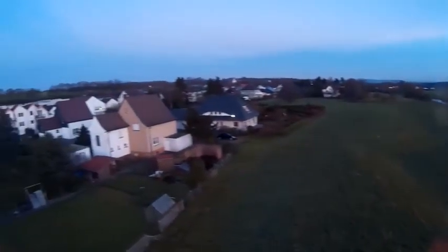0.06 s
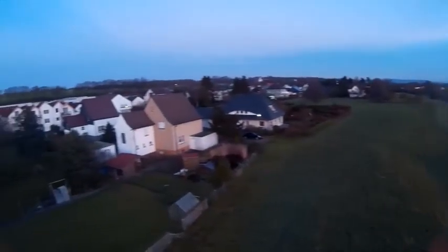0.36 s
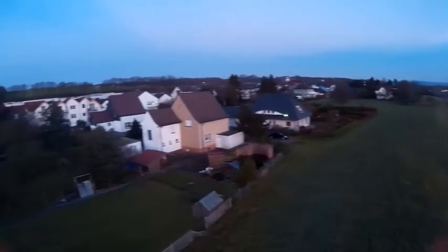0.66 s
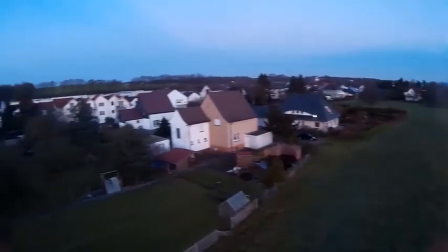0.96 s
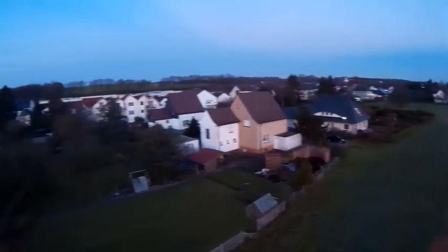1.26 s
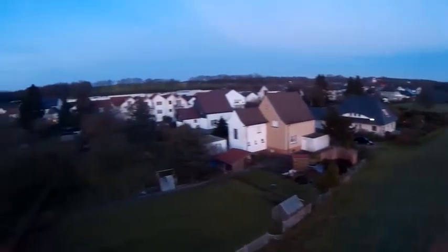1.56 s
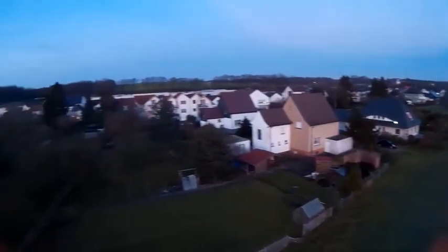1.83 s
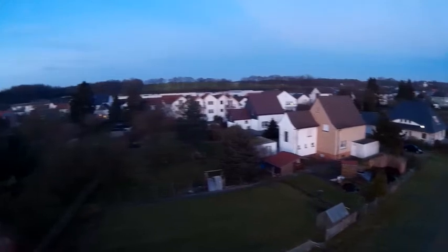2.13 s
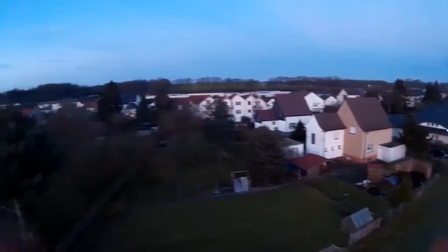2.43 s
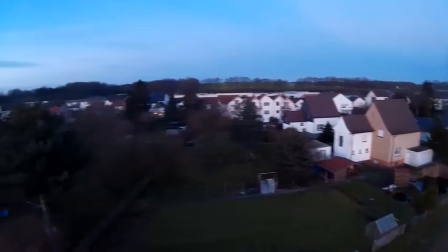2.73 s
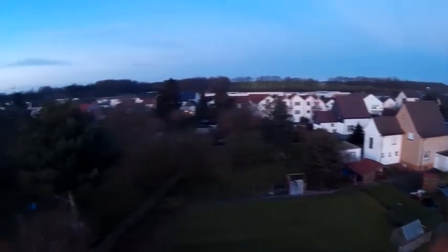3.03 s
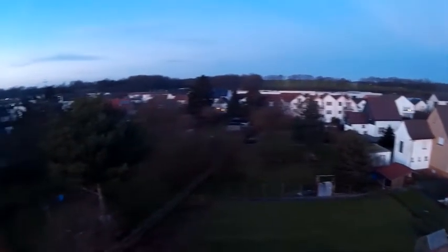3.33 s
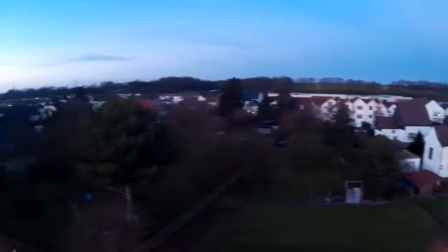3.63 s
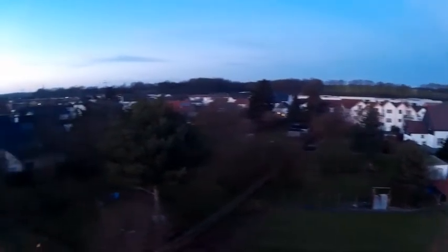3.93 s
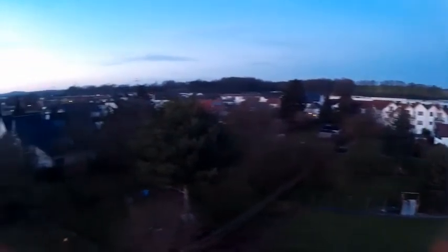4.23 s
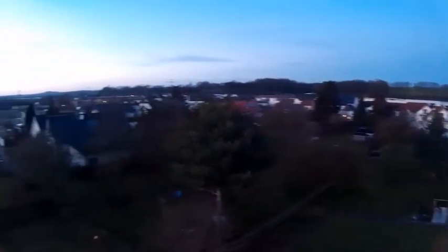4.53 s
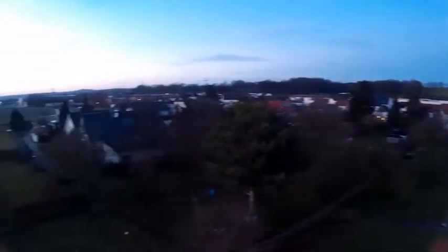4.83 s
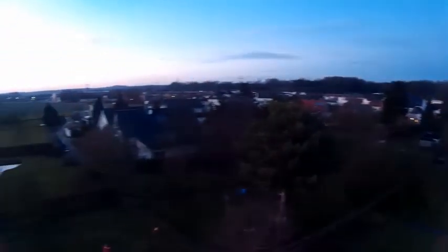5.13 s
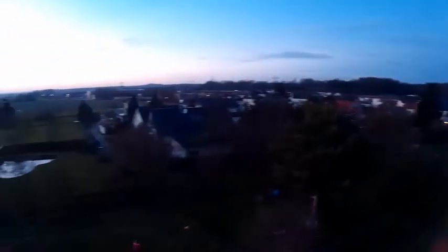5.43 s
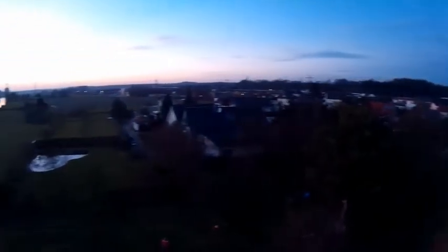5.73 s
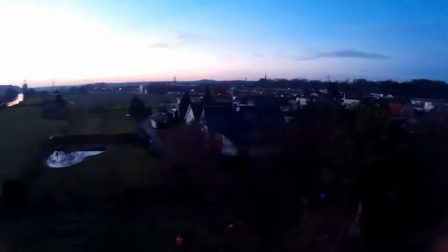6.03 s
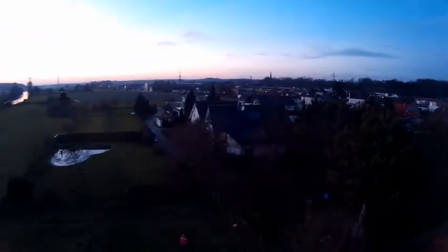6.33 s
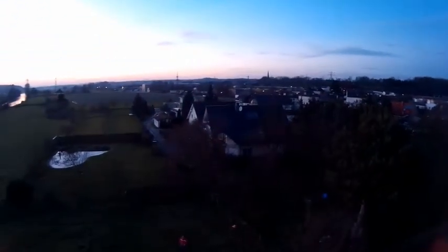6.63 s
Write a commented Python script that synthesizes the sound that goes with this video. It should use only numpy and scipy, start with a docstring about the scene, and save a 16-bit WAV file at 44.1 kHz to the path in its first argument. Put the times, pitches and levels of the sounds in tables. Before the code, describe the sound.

Close drone propellers drone on with a low, wavering hum and rushing air while a loose part buzzes and ticks.

```python
"""A four-rotor drone in flight, heard from the camera that it carries.
Four motors at slightly different speeds shake the frame and beat against one another;
the body and arms ring with their tones. The blades whir and churn the air.
The shaking makes a loose part of the camera mount buzz in quick, uneven ticks."""
import sys
import numpy as np
from scipy import signal
from scipy.fft import rfft, irfft, next_fast_len
from scipy.io import wavfile
from scipy.ndimage import map_coordinates

SR = 44100
rng = np.random.default_rng(int(sys.argv[2]) if len(sys.argv) > 2 else 0)


def bounce(signal):
    """Save signal as a 16-bit WAV file at the path given by the first command-line argument."""
    frames = np.transpose(np.atleast_2d(signal))
    limited = np.clip(frames, -1, 1)
    pcm = np.round(limited * 32767).astype(np.int16)
    wavfile.write(sys.argv[1], SR, pcm)


N = 298557


def amp(db):
    """Decibels to gain."""
    return 10 ** (np.asarray(db) / 20)


def unit(x):
    """x at rms 1."""
    return x / np.sqrt(np.mean(x ** 2) + 1e-20)


def curve(rows):
    """(seconds, value) rows interpolated to one value per sample."""
    times_s, values = np.transpose(rows)
    return np.interp(np.arange(N) / SR, times_s, values)


def wobble(knots_per_s):
    """Smooth random curve through Gaussian knots."""
    knots = rng.standard_normal(int(N * knots_per_s / SR) + 4)
    return map_coordinates(knots, [np.arange(N) * knots_per_s / SR])


def filtered(x, response):
    """x through a complex frequency response."""
    size = next_fast_len(N + 8192)
    return irfft(rfft(x, size) * response(np.fft.rfftfreq(size, 1 / SR)), size)[:N]


def coloured(x, points):
    """x through a (Hz, dB) curve, at rms 1."""
    points_hz, db = np.transpose(points)
    return unit(filtered(x, lambda hz: amp(np.interp(np.log(hz + 1), np.log(points_hz), db))))


def resonant(x, modes):
    """x through steep minimum-phase (Hz, width Hz, dB) resonances, at rms 1."""
    def response(hz):
        power = sum(amp(db) ** 2 / (1 + ((hz - centre_hz) / (width_hz / 2)) ** 4)
                    for centre_hz, width_hz, db in modes)
        cepstrum = irfft(np.log(power + 1e-9) / 2)
        causal = np.arange(len(cepstrum)) < len(cepstrum) / 2
        return np.exp(rfft(2 * cepstrum * causal))
    return unit(filtered(x, response))


# Shaft speed, one table per rotor. Each row: time in seconds, speed in turns per second.
SHAFT_1_HZ = [(0, 74.1), (.4, 74.6), (.7, 75.5), (1.2, 74.2), (1.6, 74.4), (2.3, 73.9), (3, 74.2),
              (3.2, 75.3), (3.6, 74.6), (4.15, 75.4), (4.4, 73.2), (5, 73.1), (5.35, 73.8), (5.6, 73),
              (5.8, 77.5), (6.3, 75.9), (6.55, 71.8), (6.77, 71.2)]
SHAFT_2_HZ = [(0, 70.2), (.4, 69.3), (.9, 70.6), (1.3, 69.3), (1.8, 71.2), (2, 70.2), (2.7, 71.6),
              (3.1, 73.2), (3.9, 71.1), (4.4, 71.8), (5.25, 71.2), (5.6, 72.2), (5.8, 74.3), (6, 72.8),
              (6.3, 72.4), (6.5, 68.6), (6.77, 68.7)]
SHAFT_3_HZ = [(0, 68.6), (.4, 69.7), (1, 68.6), (1.7, 67.8), (2.8, 67.7), (3.4, 66.9), (3.6, 67.9),
              (4.15, 68.5), (4.5, 65.6), (5.35, 64.9), (5.62, 66.2), (5.8, 62), (6.3, 63.5), (6.45, 62.2),
              (6.77, 63.5)]
SHAFT_4_HZ = [(0, 65.7), (.7, 64.7), (1.05, 65.8), (1.8, 65.6), (2.5, 66.3), (3.7, 66.3), (4, 65.4),
              (4.4, 68.1), (4.6, 67.4), (5, 67.2), (5.35, 68.6), (5.8, 66.2), (6.05, 68.1), (6.3, 68.5),
              (6.5, 67.1), (6.77, 68)]
def shaft_angle(speed_rows, trim_hz):
    """Rotor angle in radians; the flight controller keeps trimming the speed."""
    speed_hz = curve(speed_rows) + trim_hz * wobble(24)
    return 2 * np.pi * np.cumsum(speed_hz) / SR


# Hum per rotor. Each row: levels of orders 1, 2, 3, 4, 8 in dB, odd-order change in the swerve in dB.
HUM_ORDERS_DB = [(-38.5, -20, -42, -15, -43, 0), (-30, -27.5, -32, -21.5, -51, 10),
                 (-33, -25.5, -36, -18, -54, -6), (-19.5, -27.5, -29, -19.5, -53, -5)]
# Swerve that shifts the strain between the arms: start in seconds, length in seconds.
SWERVE_S = (5.4, .45)
# Blade hum, one table per rotor. Each row: time in seconds, even-order gain in dB.
BLADE_1_DB = [(0, -8), (.6, -12), (2, -10), (3.6, -2), (4.5, 0.5), (5.4, 1), (5.9, -4), (6.77, -6)]
BLADE_2_DB = [(0, 2), (.6, 0), (1.4, -3.5), (2.3, 0), (4.8, -4), (5.7, 5), (6.3, 0.5), (6.77, 5.5)]
BLADE_3_DB = [(0, -3), (1, -3.5), (2.6, .5), (4.1, 0.5), (4.6, -8.5), (5.4, -13), (5.85, -3), (6.77, -1.5)]
BLADE_4_DB = [(0, -1), (2.7, -0.5), (4.05, -2), (4.7, 4), (5.8, 4), (6.77, 1)]
def rotor_hum(angle, levels_db, blade_rows, flutter_db):
    """Low shaft orders of one rotor: odd from its unbalance, even from its two blades."""
    *orders_db, swerve_db = levels_db
    start_s, length_s = SWERVE_S
    unbalance_db = swerve_db * np.clip((np.arange(N) / SR - start_s) / length_s, 0, 1)
    blade_db = curve(blade_rows)
    hum = np.zeros(N)
    for order, db in zip((1, 2, 3, 4, 8), orders_db):
        gain = amp(db + (unbalance_db if order % 2 else blade_db))
        hum += gain * np.sin(order * angle + rng.uniform(0, 2 * np.pi))
    return np.sqrt(2) * hum * amp(flutter_db * wobble(40))


# Body resonances. Each row: centre in Hz, width in Hz, relative gain in dB.
BODY_MODES = [(341, 23.5, 2), (449, 53, -5), (573, 62, -2.5), (688, 65, -1.5), (850, 62, 6)]
def frame_flex(frame, cubic, level_db):
    """Uneven flexing mixes the rotor tones into sum tones that ring in the body."""
    return amp(level_db) * resonant(frame ** 2 + cubic * frame ** 3, BODY_MODES)


def blade_tones(angle, odd_db):
    """Upper shaft orders of a two-bladed propeller; unequal blades give the odd ones."""
    return sum(amp(odd_db * (order % 2)) * np.sin(order * angle + rng.uniform(0, 2 * np.pi))
               for order in range(5, 28))


# Arm resonances. Each row: centre in Hz, width in Hz, relative gain in dB.
ARM_MODES = [(1571, 92, 2.5), (1675, 47, 0), (1679, 62, 2.5)]
# Whine path to the camera. Each entry: one rotor's relative gain in dB.
WHINE_PATH_DB = [2.5, -5.5, 0, -3]
def arm_whine(angles, level_db, waver_db):
    """High shaft orders ring in the arms as a thin whine."""
    tones = sum(blade_tones(angle, odd_db=2.0) * amp(path_db + waver_db * wobble(14))
                for angle, path_db in zip(angles, WHINE_PATH_DB))
    return amp(level_db) * resonant(tones, ARM_MODES)


# Blade load. Each row: time in seconds, whir gain in dB.
LOAD_DB = [(0, -45.5), (.8, -45.5), (1.9, -46.5), (2.5, -43.5), (3.1, -45), (3.7, -41.5), (4.5, -42),
           (5.2, -40), (5.5, -41.5), (5.62, -37), (5.78, -42), (6.1, -41.5), (6.77, -43)]
# Camera housing response. Each row: frequency in Hz, relative gain in dB.
HOUSING_EQ = [(250, -9), (340, -1), (490, -5), (620, 1.5), (690, -1), (760, -6.5), (860, -4), (930, -17),
              (1200, -11.5), (1480, -10.5), (1710, -10.5), (1800, -23), (2600, -55)]
def blade_whir(angles, chop_depth, tones_gain_db, air_gain_db):
    """Blade tones and turbulence that pulses with each blade pass, heard through the housing."""
    tones = unit(sum(blade_tones(angle, odd_db=-5.0) for angle in angles))
    blade_pass = sum(np.cos(2 * angle) for angle in angles)
    turbulence = rng.standard_normal(N) * np.exp(chop_depth * blade_pass)
    whir = amp(tones_gain_db) * coloured(tones, HOUSING_EQ)
    whir += amp(air_gain_db) * coloured(turbulence, HOUSING_EQ)
    return amp(curve(LOAD_DB)) * whir


# Churned air. Each row: frequency in Hz, relative spectral density in dB.
WASH_SPECTRUM = [(20, -24), (38, -23), (53, -2.5), (80, 3), (200, 5), (600, -7), (1000, -39), (2200, -19),
                 (4500, -31), (6000, -43.5), (9500, -51.5), (11200, -43), (12500, -40), (16000, -62)]
def rotor_wash(level_db, waver_db):
    """Air churned by the blades: a low, wavering rush."""
    gain = amp(level_db + waver_db * wobble(6.06))
    return gain * coloured(rng.standard_normal(N), WASH_SPECTRUM)


# Moments when the loose part stays seated. Each row: centre in seconds, length in seconds, gain in dB.
SEATED_DIPS = [(0.054, 0.046, -10.5), (0.118, 0.056, -15), (0.286, 0.02, -16), (0.454, 0.041, -12),
               (0.549, .029, -17.5), (0.634, 0.039, -17), (.838, 0.034, -18.5), (0.926, .018, -19),
               (0.963, 0.032, -20), (1.044, 0.041, -17.5), (1.446, 0.054, -13), (1.906, 0.037, -21),
               (2.08, 0.02, -14), (2.276, 0.045, -13), (2.663, 0.022, -12), (2.759, .042, -8),
               (3.158, 0.036, -14), (3.266, 0.088, -17), (3.849, 0.017, -24), (4.033, 0.022, -14),
               (4.217, 0.014, -20), (4.856, 0.017, -13), (5.088, .025, -15), (5.136, .034, -12),
               (5.648, 0.019, -15), (5.735, 0.022, -15), (6.054, 0.034, -16), (6.184, 0.011, -21),
               (6.258, 0.022, -12)]
# Mount looseness. Each row: time in seconds, buzz level in dB.
BUZZ_DB = [(0, -38), (.35, -41), (1.2, -39), (2.1, -38.5), (2.9, -40.5), (3.5, -39), (4.4, -40), (5.2, -39),
           (6, -39.5), (6.77, -39.5)]
def looseness_db(swell_db=1.13, catches=10, catch_s=0.019, catch_db=-7):
    """Buzz level: swells at random, dips when the loose part seats or briefly catches."""
    t = np.arange(N) / SR
    random_dips = [(centre_s, catch_s, catch_db) for centre_s in rng.uniform(0, N / SR, size=catches)]
    dips_db = np.zeros(N)
    for centre_s, length_s, db in SEATED_DIPS + random_dips:
        near = slice(*np.searchsorted(t, [centre_s - length_s, centre_s + length_s]))
        window = np.exp(-((t[near] - centre_s) / (length_s / 2)) ** 4)
        dips_db[near] = np.minimum(dips_db[near], db * window)
    return curve(BUZZ_DB) + swell_db * wobble(20) + dips_db


def mount_blows(frame, slack=0.054, jitter_s=0.0007, scatter_db=0.5, bounce_s=0.0011, bounce_db=-8.5):
    """The loose part strikes at each crest of the shaking that takes up its slack, then bounces."""
    jolts = unit(np.gradient(frame))
    shake = unit(jolts + 0.9 * unit(frame))
    crests = signal.find_peaks(shake)[0]
    force = np.tanh(2 * np.clip(shake[crests] - slack, 0, None))
    strike_draw, gap_draw, bounce_draw, lag_draw = rng.standard_normal((len(crests), 4)).T
    strikes = crests + (SR * jitter_s * np.abs(lag_draw)).astype(int)
    bounces = strikes + (SR * bounce_s * np.exp(0.32 * gap_draw)).astype(int)
    strike_force = force * amp(scatter_db * np.tanh(strike_draw))
    bounce_force = force * amp(bounce_db + scatter_db * np.tanh(bounce_draw))
    return np.bincount(strikes, strike_force, N)[:N] + np.bincount(bounces, bounce_force, N)[:N]


def contact_noise(blows, decay_s):
    """Noise that dies away after each blow."""
    envelope = signal.lfilter([1], [1, -np.exp(-1 / (SR * decay_s))], blows)
    return envelope * rng.standard_normal(N)


# Mount resonances. Each row: centre in Hz, width in Hz, relative gain in dB.
MOUNT_MODES = [(1674, 370, -6), (2210, 1070, -12.5), (2985, 494, -4), (3923, 385, -3.5), (4400, 380, -2.5),
               (4900, 450, -4), (5990, 730, -7.5), (6940, 520, -0.5), (7730, 580, 1.5), (9240, 850, -1),
               (10250, 460, -3), (11300, 1800, -9), (14100, 1300, -11.5)]
def mount_buzz(blows, scrape_gain, shiver_gain, shiver_cutoff_hz):
    """Blows ring the mount; each contact slides an instant and the shell shivers a little longer."""
    shiver = contact_noise(blows, decay_s=0.001)
    shiver = filtered(shiver, lambda hz: 1 / (1 + (hz / shiver_cutoff_hz) ** 4))
    scrape = contact_noise(blows, decay_s=0.00035)
    contacts = blows + scrape_gain * scrape + shiver_gain * shiver
    return resonant(contacts, MOUNT_MODES) * amp(looseness_db())


def scene():
    """Four rotors, their air, and the mount that they shake."""
    speeds = (SHAFT_1_HZ, SHAFT_2_HZ, SHAFT_3_HZ, SHAFT_4_HZ)
    blades = (BLADE_1_DB, BLADE_2_DB, BLADE_3_DB, BLADE_4_DB)
    angles = [shaft_angle(speed_rows, trim_hz=0.12) for speed_rows in speeds]
    frame = sum(rotor_hum(angle, levels_db, blade_rows, flutter_db=1.19)
                for angle, levels_db, blade_rows in zip(angles, HUM_ORDERS_DB, blades))
    flex = frame_flex(frame, cubic=0.98, level_db=-34.5)
    whine = arm_whine(angles, level_db=-44.5, waver_db=1.5)
    whir = blade_whir(angles, chop_depth=0.24, tones_gain_db=6, air_gain_db=9.5)
    wash = rotor_wash(level_db=-36.0, waver_db=1.0)
    buzz = mount_buzz(mount_blows(frame), scrape_gain=0.81, shiver_gain=1.07, shiver_cutoff_hz=4900)
    return frame + flex + whine + whir + wash + buzz


def record(dry, cutoff_hz=15000):
    """The camera rounds off the highest peaks and cuts the treble above its band limit."""
    rounded = dry / (1 + np.abs(dry) ** 10) ** (1 / 10)
    return filtered(rounded, lambda hz: 1 / np.sqrt(1 + (hz / cutoff_hz) ** 120))


dry = scene()
out = record(dry)
bounce(out)
```